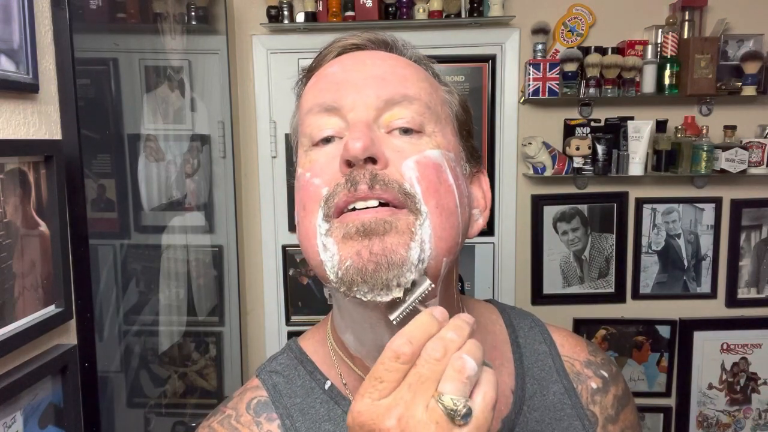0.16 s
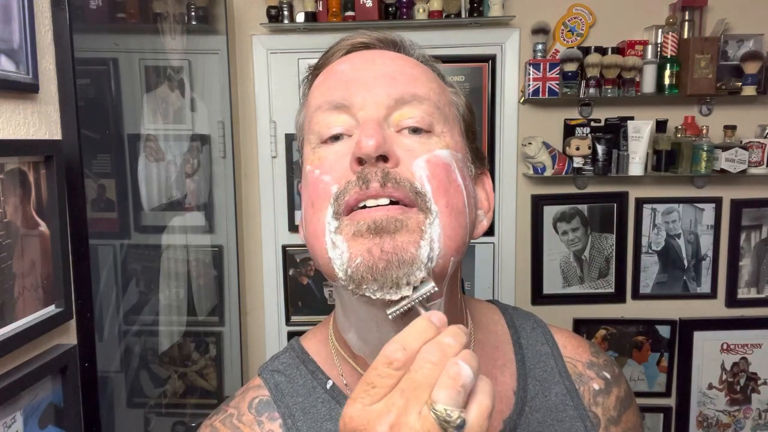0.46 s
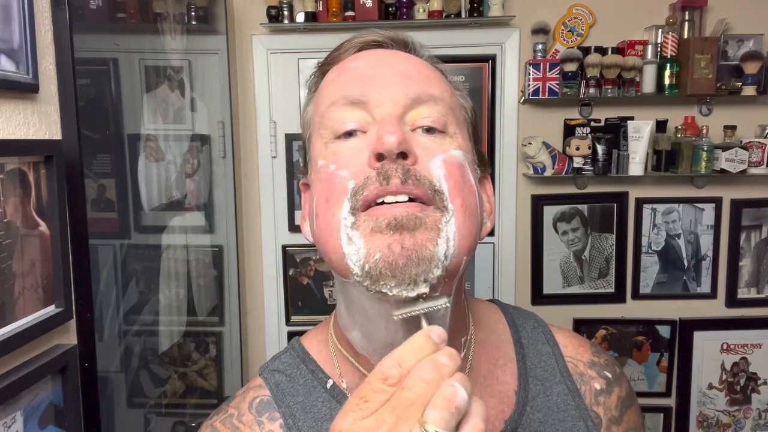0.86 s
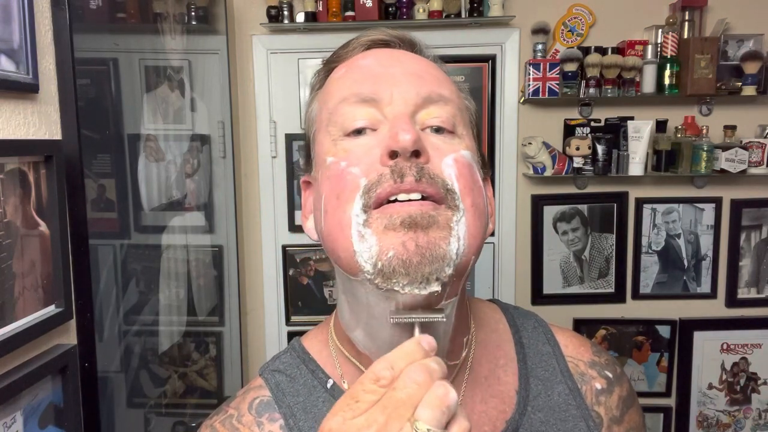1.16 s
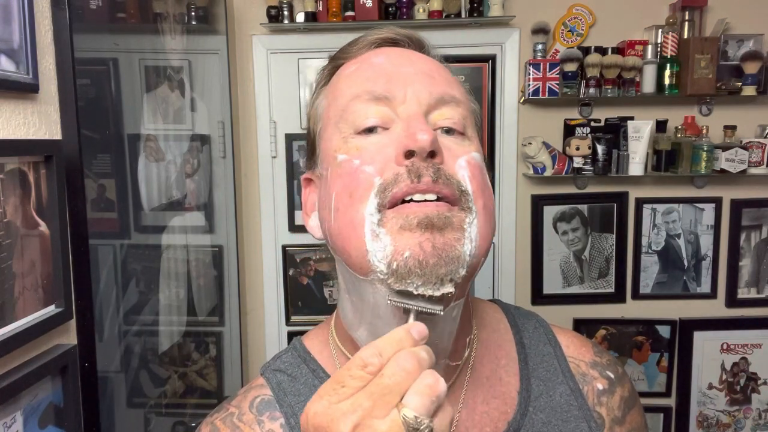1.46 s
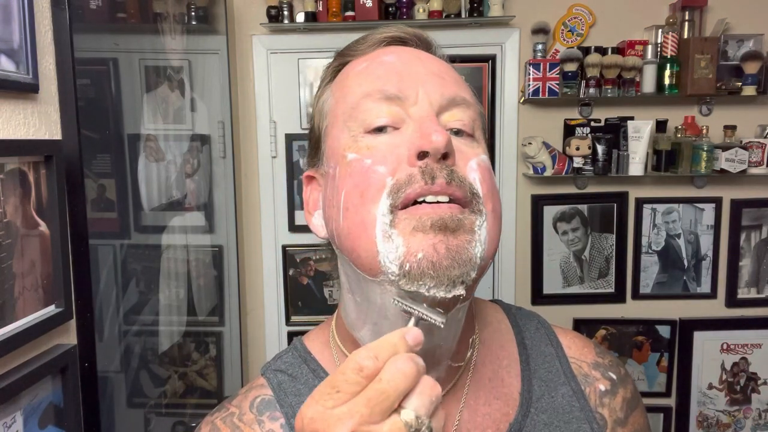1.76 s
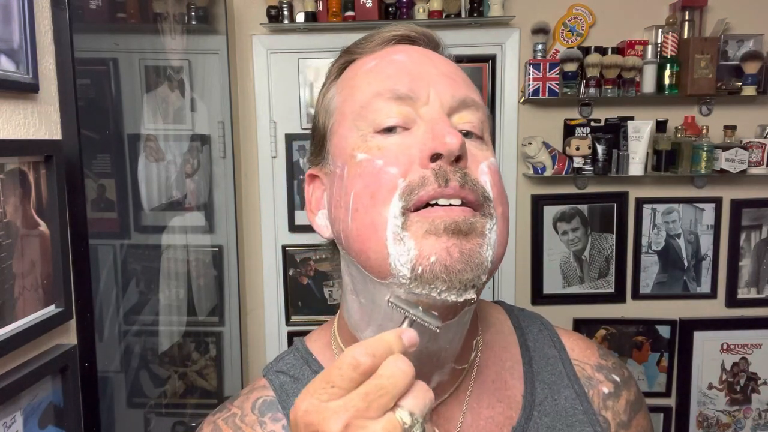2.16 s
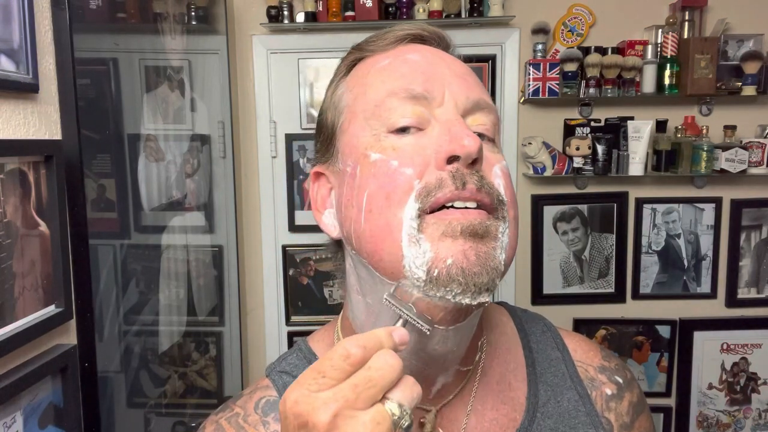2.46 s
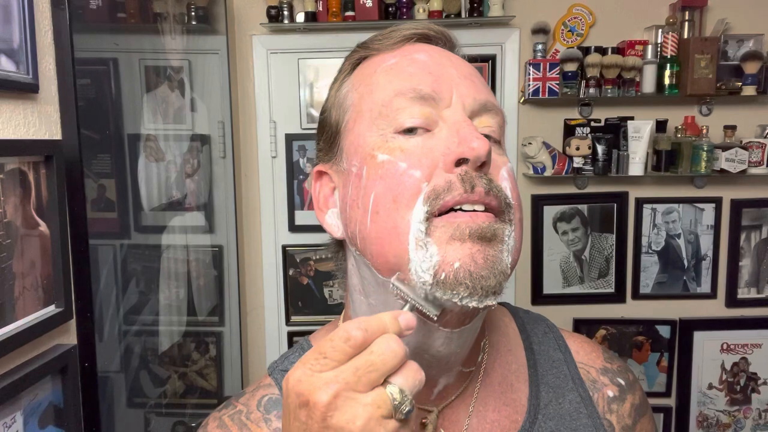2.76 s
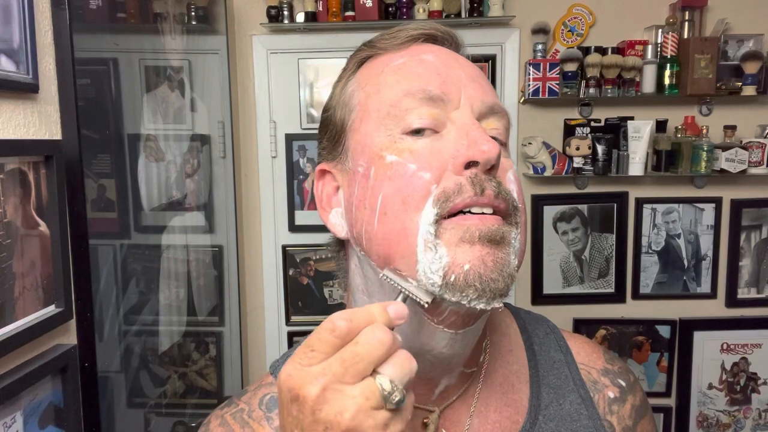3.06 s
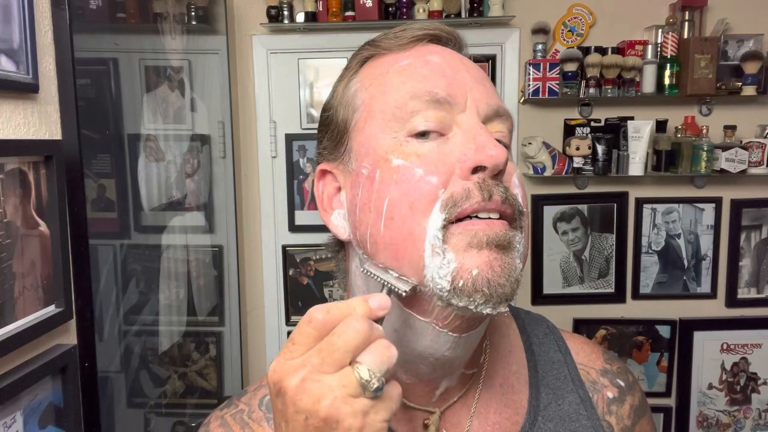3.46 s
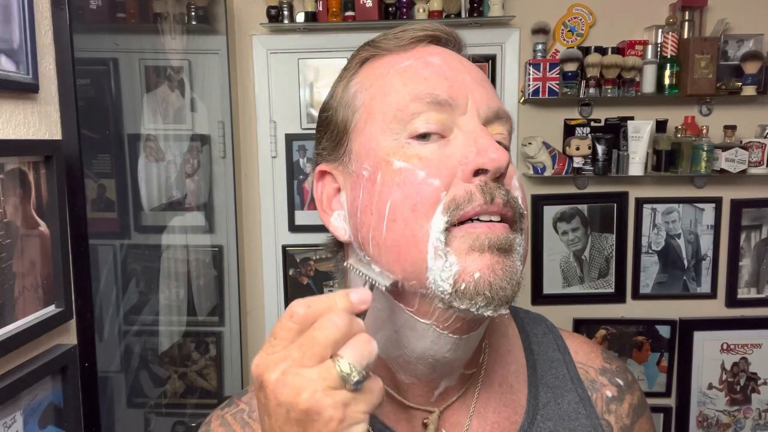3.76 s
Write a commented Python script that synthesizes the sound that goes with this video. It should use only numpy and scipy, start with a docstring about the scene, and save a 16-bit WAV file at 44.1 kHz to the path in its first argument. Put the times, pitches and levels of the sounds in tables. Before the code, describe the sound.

A safety razor rasps through lathered stubble in short scratchy strokes with pauses and tiny wet ticks; near the end a dull thump booms through a wall. Close microphone, small quiet room.

```python
"""Shaving with a safety razor

Short strokes through lathered stubble, close to a phone in a small quiet room. Random clicks stand for
hairs snapping and ring the razor head; more clicks make the skin's rasp and a late, rising fizz of lather.
Bursting lather ticks as very short rings. Near the end a dull thump comes through a wall as short wave
packets, and the room booms on in slowly fading tones and noise. Filtered noise makes the rumble and hiss."""
import sys
import numpy as np
from scipy import signal
from scipy.fft import rfft, irfft
from scipy.io import wavfile
from scipy.ndimage import uniform_filter1d

SR = 44100
rng = np.random.default_rng(int(sys.argv[2]) if len(sys.argv) > 2 else 0)


def store_pcm(level_fs):
    """Save levels as 16-bit WAV."""
    pcm = np.round(np.clip(level_fs, -1, 1) * 32767).astype(np.int16)
    wavfile.write(sys.argv[1], SR, np.atleast_2d(pcm).T)


N = 171990
EVENT_SAMPLES, LEAD_S = 24576, 0.1  # length of one stroke or tick buffer, and the time before its start


def amp(db):
    """Turn decibels into a gain."""
    return 10 ** (np.asarray(db) / 20)


def unit(x):
    """Scale to an average strength (rms) of 1."""
    return x / np.sqrt(np.mean(x ** 2) + 1e-30)


def fade(u, t60):
    """Die away by 60 dB in t60 seconds."""
    return np.exp(-np.log(1000) * u / t60)


def curve(points, size):
    """Gain at every frequency, drawn through (frequency [Hz], level [dB]) points."""
    hz, db = np.array(points, float).T
    freqs = np.fft.rfftfreq(size, 1 / SR) + 1
    return amp(np.interp(np.log(freqs), np.log(hz), db))


def colour(x, points):
    """Make some pitches of a sound stronger and others weaker."""
    size = x.shape[-1]
    return irfft(rfft(x) * curve(points, size), size)


def add(out, x, at):
    """Mix a stereo sound in at a time in seconds, dropping what falls outside."""
    i = int(round(at * SR))
    x = x[:, max(-i, 0):max(N - i, 0)]
    first = max(i, 0)
    out[:, first:first + x.shape[1]] += x


def walk(rate, size):
    """Smooth random wandering with an rms of 1, with `rate` new values per second."""
    k = max(int(SR / rate), 2)
    steps = np.repeat(rng.standard_normal(size)[:size // k + 1], k)
    return unit(uniform_filter1d(steps, k)[:size])


def snaps(rate, spread_db, size):
    """Dense tiny clicks at random moments, a few much larger than the rest."""
    size_db = spread_db * np.minimum(rng.exponential(size=size), 5)
    strength = amp(size_db) * rng.choice([-1, 1], size)
    return unit(strength * (rng.random(size) < rate / SR))


def diffuse(points, wide_hz):
    """Noise from all sides: alike at both microphone ports in the bass, unrelated above wide_hz."""
    mid, side = rfft(rng.standard_normal((2, N))) * curve(points, N)
    side = side * np.minimum(np.fft.rfftfreq(N, 1 / SR) / wide_hz, 1) ** 0.87
    return irfft(np.array([mid + side, mid - side]), N)


# how far the left microphone port leads the right: (frequency [Hz], lead [radians])
PORT_LEAD = [(1200, 0), (2050, -2.5), (2500, -1.5), (3300, -2), (5000, -2.5), (5800, -4.5), (7300, -4.5),
             (9300, -2), (10600, -0.5), (12800, 2), (14500, 2)]
ECHO_S, ECHO_DB = 0.00123, -12  # echo from a surface beside the phone; its delay varies a little
ROOM_T60_S = 0.18


def near(x, room_db):
    """A close sound at two ports: a quick echo, then room reflections drawn anew for each event."""
    f, t = np.fft.rfftfreq(len(x), 1 / SR), np.arange(SR // 4) / SR
    echo_s = ECHO_S * rng.uniform(0.922, 1.04)
    left = rfft(x) * (1 + amp(ECHO_DB) * np.exp(-2j * np.pi * f * echo_s))
    right = left * np.exp(-1j * np.interp(f, *np.array(PORT_LEAD).T))
    direct = irfft(np.array([left, right]), len(x))
    # the room tail is stronger in its first few milliseconds
    early = 1 + 1.85 * np.exp(-t / 0.0024)
    tail = rng.standard_normal((2, len(t))) * fade(t, ROOM_T60_S) * (t > ECHO_S) * early
    tail /= np.sqrt(np.sum(tail ** 2, axis=1, keepdims=True))
    return direct + amp(room_db) * signal.fftconvolve(x[None], tail, axes=1)[:, :len(x)]


# tone of the rumble, before a second filter dulls it: (frequency [Hz], level [dB])
RUMBLE_COLOUR = [(15, -50), (25, -18), (35, -5.5), (54, -2), (107, 0), (126, -1.5), (151, -15.5),
                 (207, -16.5), (267, -24), (325, -23), (389, -20.5), (465, -29.5), (900, -34), (1170, -74),
                 (1980, -120)]
# tone of the hiss: (frequency [Hz], level [dB])
HISS_COLOUR = [(300, -20), (900, 0), (1400, 1.5), (2500, -4), (5000, -5.5), (8000, -14.5), (11000, -4),
               (13700, -14.5), (15000, -27)]
# rise and fall of the deepest rumble: (time [s], level change [dB])
RUMBLE_SWELL = [(0, -1.5), (1, 1), (2.9, -1.5), (3.2, 1.5), (3.4, 7), (3.9, 1)]
RUMBLE_DB, HISS_DB = -64.5, -82  # rms, the rumble before its swell
RUMBLE_WIDE_HZ, HISS_WIDE_HZ = 447, 890
SWELL_TOP_HZ = 215  # above this the swell has less and less effect


def room_tone(t):
    """Steady rumble of the house, its deepest part swelling late, and a faint hiss."""
    noise = diffuse(RUMBLE_COLOUR, RUMBLE_WIDE_HZ)
    rumble = amp(RUMBLE_DB) * unit(colour(noise, [(600, 2.0), (1000, -5.5), (3000, -44)]))
    deep = colour(rumble, [(SWELL_TOP_HZ, 0), (2 * SWELL_TOP_HZ, -20)])
    swell = amp(np.interp(t, *np.array(RUMBLE_SWELL).T))
    hiss = amp(HISS_DB) * unit(diffuse(HISS_COLOUR, HISS_WIDE_HZ))
    return rumble + (swell - 1) * deep + hiss


THUMP_S, DISPERSION = 3.578, 0.51  # moment of the blow; waves arrive DISPERSION / sqrt(Hz) seconds later
SIDES = np.array([[0.5], [-0.5]])  # splits a left-right difference between left and right


def since_arrival(t, hz, right_lag):
    """Time since the wave arrived at each port: in a bending wall, high pitches travel faster."""
    return t - THUMP_S - DISPERSION / np.sqrt(hz) + SIDES * right_lag


# wave packets of the wall, pitch and level before the shifts in RETURNS:
# (frequency [Hz], level [dB], half length [s], right lag [s], left minus right [dB])
WALL = [(114, -18, .015, 0, 0.5), (224, -26, 0.0067, .0002, -6.5), (347, -22, 0.0052, -.0004, 2),
        (641, -34, 0.0031, .0006, -5)]
# first arrival and returns from the far walls, before their extra loss: (delay [s], level [dB])
RETURNS = [(0, 0.5), (.047, -12), (.105, -14.5), (.134, -19.5), (.173, -17), (.221, -20)]
RETURN_SAG_OCT_PER_S, RETURN_LOSS_DB_PER_CYCLE = 1.32, 0.4  # later returns are lower and duller


def wall_blow(t):
    """The blow arrives as short wave packets, highs first, then rolls back ever lower and duller."""
    out = np.zeros((2, N))
    for delay, return_db in RETURNS:
        sag = 2 ** (-RETURN_SAG_OCT_PER_S * delay)
        for hz, db, half, lag, pan_db in WALL:
            u = since_arrival(t, hz, lag) - delay
            loss_db = RETURN_LOSS_DB_PER_CYCLE * hz * delay
            gain = amp(db + return_db - loss_db + SIDES * pan_db)
            out += gain * np.cos(2 * np.pi * hz * sag * u) * np.exp(-(u / half) ** 2)
    return out


# low tones at which the room booms, level before onset and fade:
# (frequency [Hz], level [dB], 60 dB fade time [s], right lag [s], left minus right [dB])
BOOM = [(86.2, -55, 0.7, 0, -1), (104.8, -47, 0.57, -0.0024, 4), (170.5, -39, 0.73, 0, 8),
        (218.9, -35.5, 0.51, .0002, -2), (238, -38.5, 0.41, -.0003, -8), (257.2, -38.5, 0.43, 0.013, 1.5),
        (338.4, -31, 0.265, 0.011, 0.5), (383.5, -48, 0.24, -.0006, -4), (497.6, -36.5, 0.2, 0.0018, 11),
        (528.7, -35, 0.2, 0.018, -4.5), (588.5, -45.5, 0.32, .0004, -8), (625, -60, .22, -0.014, -8),
        (745, -49, 0.093, .0003, 2), (911, -57.5, 0.24, -0.017, -5)]


def room_boom(t):
    """The thump sets off the room's own low tones, each swelling quickly and fading at its own pace."""
    out = np.zeros((2, N))
    for hz, db, t60, lag, pan_db in BOOM:
        u = np.maximum(since_arrival(t, hz, lag), 0)
        onset = 1 - np.exp(-u / 0.0053)
        out += amp(db + SIDES * pan_db) * np.sin(2 * np.pi * hz * u) * onset * fade(u, t60)
    return out


# tone of the thump's noisy tail: (frequency [Hz], level [dB])
TAIL = [(25, -48), (45, -12), (70, 0), (120, -5), (170, -13.5), (260, -4), (400, -5.5), (460, -9),
        (650, -14), (850, -27), (1200, -30), (2000, -42), (4000, -62)]
TAIL_DB, TAIL_LOW_T60_S, TAIL_HIGH_T60_S = -32.5, 0.49, 0.2  # level before onset and fade


def thump_tail(t):
    """Countless reflections blur into noise, whose highs arrive first and fade first."""
    out = np.zeros((2, N))
    noise = unit(diffuse(TAIL, wide_hz=480))
    low = colour(noise, [(250, 1), (400, -6.5), (650, -22.5), (1200, -69)])
    high = noise - low
    for band, hz, rise, t60 in ((low, 220, 0.009, TAIL_LOW_T60_S), (high, 900, 0.002, TAIL_HIGH_T60_S)):
        u = np.maximum(since_arrival(t, hz, 0), 0)
        out += amp(TAIL_DB) * band * (1 - np.exp(-u / rise)) ** 2 * fade(u, t60)
    return out


def thump(t):
    """A blow travels through the wall and sets the room booming."""
    return wall_blow(t) + room_boom(t) + thump_tail(t)


# wet ticks of lather and blade, level before TICK_DB and colouring:
# (time [s], level [dB], ring frequency [Hz])
TICKS = [(0.0256, -39.5, 9350), (0.259, -44.5, 10200), (0.273, -50, 11400), (.298, -44, 11700),
         (0.7536, -43.5, 11600), (1.091, -32, 12400), (1.161, -45, 7600), (1.207, -45.5, 10000),
         (1.216, -46, 10400), (1.272, -51, 10500), (2.034, -47.5, 9200), (2.4595, -32, 9500),
         (2.8831, -42, 10200), (3.26, -32.5, 12100), (3.658, -37, 11000), (3.6815, -43.5, 10700)]
# tone of the ticks: (frequency [Hz], level [dB])
TICK_COLOUR = [(500, -28), (2000, -23), (5000, 3), (8000, -1), (11000, 1), (16000, -5.5)]
TICK_DB, TICK_RING_S, TICK_ROOM_DB = 4, 0.000099, -2


def ticks():
    """Films of lather burst with a very short ring."""
    out = np.zeros((2, N))
    u = np.maximum(np.arange(EVENT_SAMPLES) / SR - LEAD_S, 0)
    for at, db, hz in TICKS:
        pop = amp(db + TICK_DB) * np.sin(2 * np.pi * hz * u) * np.exp(-u / TICK_RING_S)
        add(out, near(colour(pop, TICK_COLOUR), TICK_ROOM_DB), at - LEAD_S)
    return out


RELEASE_S = 0.019


def pressure(u, length, attack, swell_db):
    """The blade lands, drags with growing or easing force, and lets go."""
    land = np.exp(np.minimum(u, 0) * 2 / attack)
    lift = np.exp(-np.maximum(u - length, 0) / RELEASE_S)
    return land * lift * amp(swell_db * (np.clip(u / length, 0, 1) - 0.5))


CATCHES_PER_S, CATCH_S = 44, 0.0029
CATCH_DB, BITE_DB = -3.5, -32  # typical snag and landing snag, against the steady drag


def catches(u):
    """Sudden snags slip free within milliseconds; a faint one comes as the blade lands."""
    caught = rng.random(len(u)) < CATCHES_PER_S / SR
    snags = caught * rng.uniform(0.48, 1.6, len(u)) * amp(CATCH_DB)
    snags[np.searchsorted(u, 0)] += amp(BITE_DB)
    slip = np.exp(-1 / (CATCH_S * SR))
    return unit(1 + signal.lfilter([1], [1, -slip], snags))


TWANGS_PER_S, TWANG_LOW_HZ, TWANG_HIGH_HZ, TWANG_RING_S = 170, 2380, 6930, 0.0011


def twangs(size):
    """Single coarse hairs flick off the blade, each ringing briefly at its own pitch."""
    out, u = np.zeros(size), np.arange(SR // 100) / SR
    count = int(TWANGS_PER_S * size / SR)
    for place, pitch, strength in rng.random((count, 3)):
        i = int(place * (size - len(u)))
        hz = TWANG_LOW_HZ * (TWANG_HIGH_HZ / TWANG_LOW_HZ) ** pitch
        out[i:i + len(u)] += strength * np.sin(2 * np.pi * hz * u) * np.exp(-u / TWANG_RING_S)
    return unit(out)


# tone of the blade on hair: (frequency [Hz], level [dB])
BLADE = [(700, -44), (1500, -12), (2100, -7.5), (2500, -2.5), (2950, -7.5), (3450, 0), (4700, 2.5),
         (6200, 4), (7600, -9), (9500, -9.5), (15000, -35)]
# ringing of the razor head, before each stroke's ring level: (frequency [Hz], width [Hz], level [dB])
HEAD = [(2563, 290, 9), (3360, 400, -1), (3870, 160, -16)]
HAIRS_PER_S, HAIR_SPREAD_DB, SCRAPE_DB = 2600, 3.5, 0.5
EDGE_HZ, EDGE_WIDTH_HZ = 7550, 740  # where a sharply angled blade sounds brightest


def hair_scrape(force, ring_db, sharp_db):
    """Snapping hairs ring the razor head, brighter or duller with the blade's angle."""
    n = len(force)
    f = np.fft.rfftfreq(n, 1 / SR) + 1
    head = sum(amp(db) / (1 + ((f * f - hz * hz) / (f * width)) ** 2) for hz, width, db in HEAD)
    edge = np.exp(-((f - EDGE_HZ) / EDGE_WIDTH_HZ) ** 2)
    body = unit(curve(BLADE, n) * (1 + amp(ring_db) * head) * amp(sharp_db * edge))
    hairs = snaps(HAIRS_PER_S, HAIR_SPREAD_DB, n) * force
    return irfft(rfft(hairs) * body, n) * amp(SCRAPE_DB)


# tone of the skin's rasp, before its pitch shift: (frequency [Hz], level [dB])
RASP = [(400, -30), (950, -19), (1280, 1.5), (1700, 0.5), (2150, -3), (2800, -5), (4000, -9), (9000, -27)]
RASP_DB, RASP_SAG_OCT_PER_DB = -6, 0.022


def skin_rasp(force, rasp_db):
    """The skin judders under the blade; the harder the drag, the louder and lower the rasp."""
    sag = 2 ** (-RASP_SAG_OCT_PER_DB * rasp_db)
    skin = [(hz * sag, gain_db) for hz, gain_db in RASP]
    grains = snaps(HAIRS_PER_S, HAIR_SPREAD_DB, len(force))
    return unit(colour(grains, skin)) * force * amp(RASP_DB + rasp_db)


# tone of the lather's fizz: (frequency [Hz], level [dB])
FIZZ = [(3000, -44), (6500, -7), (8800, 3.5), (10500, 5), (12500, 0), (14000, 1.5), (15500, -25),
        (17000, -39)]
BUBBLES_PER_S, BUBBLE_SPREAD_DB, FIZZ_DB = 2800, 3.8, -2.5


def lather_fizz(foam, fizz_db):
    """Many small bubbles burst as the lather builds up."""
    bubbles = snaps(BUBBLES_PER_S, BUBBLE_SPREAD_DB, len(foam))
    return unit(colour(bubbles, FIZZ)) * foam * amp(FIZZ_DB + fizz_db)


# strokes, levels before the layer settings: (start [s], length [s], attack [s], level [dB],
# swell from start to end [dB], rasp [dB], fizz [dB], head ring [dB], sharpness [dB])
STROKES = [(0.119, 0.138, 0.028, -64.5, -1.5, -12, -0.5, -8, -2),
           (0.417, 0.027, 0.0073, -91.5, -5, -14, 12.5, -8, 2),
           (0.463, 0.033, 0.019, -76.5, -5, -20, -9, -20, -18),
           (0.557, 0.16, 0.051, -68.5, 1.5, -15, -2.5, -14, -10),
           (0.925, 0.066, 0.023, -81.5, 4, -1, -19, -26, 7),
           (1.044, 0.097, 0.026, -67, 4, -4.5, -1, -16, -1),
           (1.439, 0.033, 0.016, -64.5, 4.5, -11, -13.5, -5, -21),
           (1.504, 0.077, 0.031, -64.5, 3, -7, -5, -16, 0),
           (1.842, 0.013, 0.0027, -75.5, -3, -11, -1.5, -25, 10),
           (1.875, 0.12, 0.02, -67, -5.5, -8, -10.5, -4.5, 0.5),
           (2.272, 0.04, 0.014, -73, 4.5, 4, -14, -13, -4.5),
           (2.321, 0.1, 0.003, -64.5, -1, -1, -6.5, 1, -3), (2.647, 0.04, 0.0083, -75.5, 0.5, 5, 0, -27, 8),
           (2.714, 0.041, 0.0026, -64, 4.5, 5.5, -11.5, 8.5, 1),
           (2.769, 0.057, .01, -68.5, 2.5, 3, -10.5, -4, 7),
           (3.017, 0.029, 0.009, -88.5, -7, -12, 9, -10, 2),
           (3.094, 0.072, 0.015, -65.5, -2.5, -8.5, -5, 1.5, -2.5),
           (3.184, 0.04, 0.023, -62, 2, -11, -6.5, 11, 3), (3.464, 0.022, .004, -70, 0, 0, -4, 8, 4),
           (3.496, .13, 0.031, -62.5, -6.5, -3, -3.5, 9, 4), (3.808, 0.011, .005, -86, -6, -8, -12, 6, -11),
           (3.882, 0.09, 0.015, -62, -3.5, -8, -1, 9, -3)]
DRAG_DB, TWANG_DB, SCRAPE_ROOM_DB = 0.66, -5, -1.5  # wobble of the drag, twangs against stroke, room
FIZZ_LAG_S, FIZZ_RISE_DB = 0.0098, 9.5  # fizz comes later and grows more, so strokes end brighter
BLADE_LEFT_DB = -4  # the blade is weaker on the left


def razor():
    """Each stroke scrapes and twangs hairs, rasps the skin and fizzes the lather."""
    out, n = np.zeros((2, N)), EVENT_SAMPLES
    u = np.arange(n) / SR - LEAD_S
    for start, length, attack, db, swell_db, rasp_db, fizz_db, ring_db, sharp_db in STROKES:
        drag = amp(db + DRAG_DB * walk(130, n))
        push = pressure(u, length, attack, swell_db)
        force = drag * catches(u) * push
        foam = drag * pressure(u - FIZZ_LAG_S, length, attack, swell_db + FIZZ_RISE_DB)
        blade = hair_scrape(force, ring_db, sharp_db) + twangs(n) * push * amp(db + TWANG_DB)
        soft = skin_rasp(force, rasp_db) + lather_fizz(foam, fizz_db)
        stroke = near(blade, SCRAPE_ROOM_DB) * amp([[BLADE_LEFT_DB], [0]]) + near(soft, SCRAPE_ROOM_DB)
        add(out, stroke, start - LEAD_S)
    return out


def scene():
    """Room tone, thump, ticks and razor together."""
    t = np.arange(N) / SR
    return room_tone(t) + thump(t) + ticks() + razor()


TOP_HZ = 16100


def record(dry):
    """The phone steeply cuts the treble above TOP_HZ."""
    treble_cut = signal.ellip(8, 0.2, 70, TOP_HZ, fs=SR, output="sos")
    return signal.sosfilt(treble_cut, dry)


dry = scene()
out = record(dry)
store_pcm(out)
```